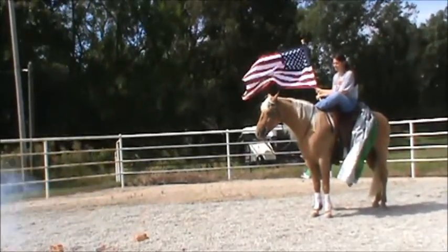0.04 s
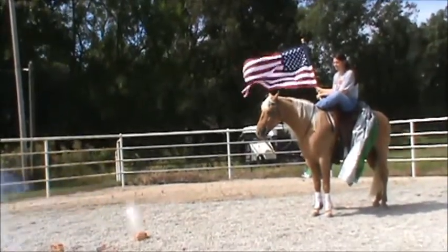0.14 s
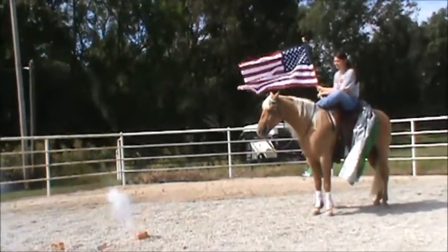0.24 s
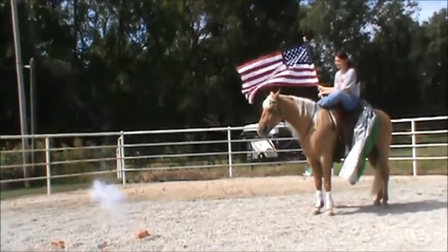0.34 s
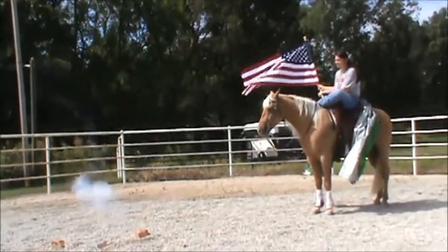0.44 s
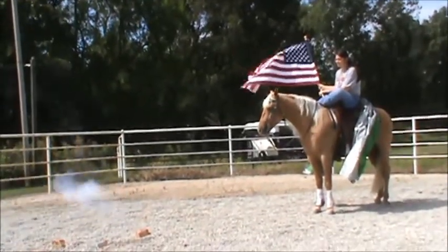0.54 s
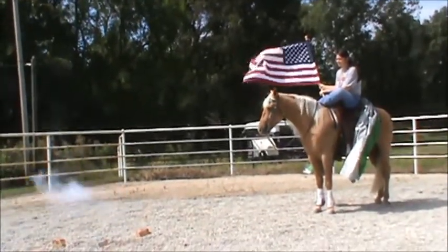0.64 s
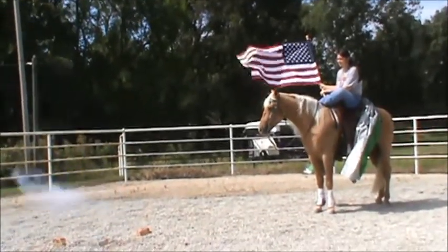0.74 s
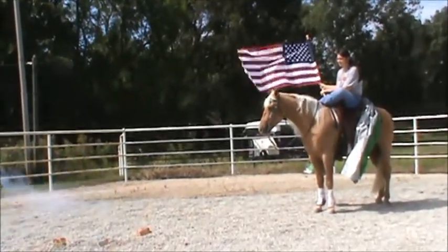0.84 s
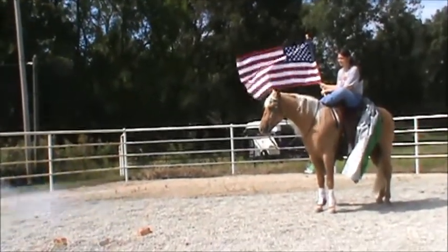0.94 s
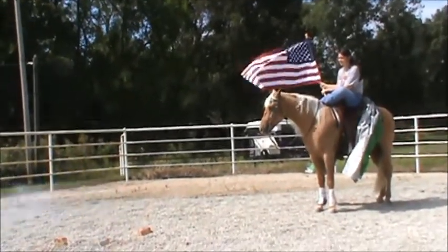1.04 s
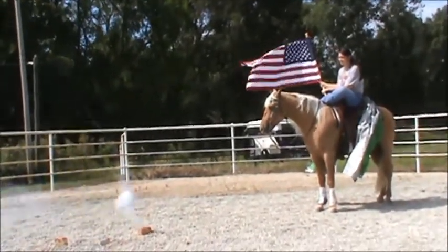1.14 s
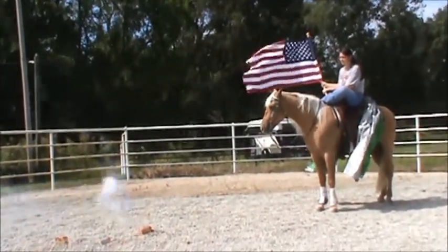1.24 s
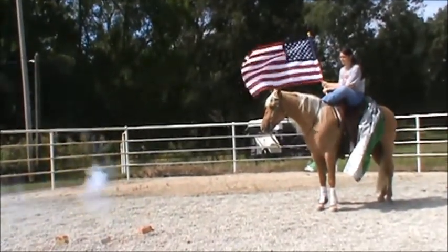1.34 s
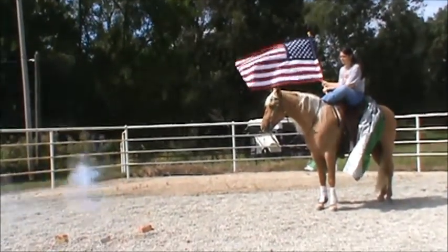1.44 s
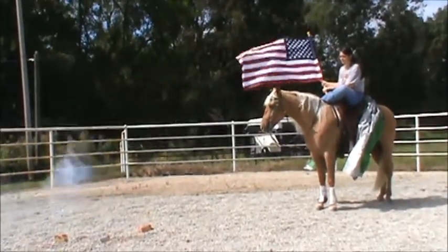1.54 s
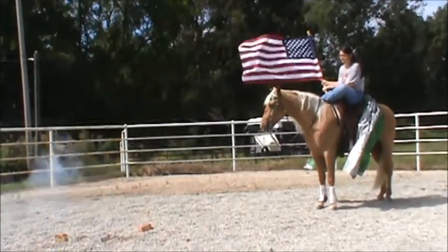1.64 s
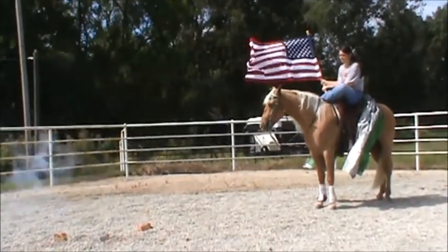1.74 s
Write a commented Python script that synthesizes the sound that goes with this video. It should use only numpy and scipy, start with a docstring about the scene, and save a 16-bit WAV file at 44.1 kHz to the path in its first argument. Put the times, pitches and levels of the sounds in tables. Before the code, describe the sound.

Two small whistling fireworks launch in turn, each screaming downward in pitch and bursting with a bang

```python
"""Faint outdoor hiss and wind buffeting come first, with the dying echo of an earlier whistle.
Two small rockets then leave a ground firework in an open, tree-lined arena, each with a thump and crack.
Each screams as gliding, fluttering partials over gas-jet noise, its pitch falling for most of its flight.
A minimum-phase shock makes each burst, and the ground returns a duller copy.
The trees scatter it all into a long wash of echo: noise that decays at its own speed in each band."""
import sys
import numpy as np
from scipy import signal
from scipy.fft import rfft, irfft
from scipy.io import wavfile

SR = 44100
rng = np.random.default_rng(int(sys.argv[2]) if len(sys.argv) > 2 else 0)


def int16_out(signal):
    """Quantize to a 16-bit WAV file."""
    q = np.round(np.clip(np.atleast_2d(signal).T, -1, 1) * 32767)
    wavfile.write(sys.argv[1], SR, q.astype(np.int16))


N = 77175
T = np.arange(N) / SR  # time in seconds
FREQS = np.fft.rfftfreq(N, 1 / SR)
ECHO_SAME, JET_SAME = 0.68, 0.95  # left-right likeness of the noise, 1 = identical
FLUTTER_HZ = 81  # rate limit of the level flutter


def amp(db):
    """Level law: decibels to amplitude gain."""
    return 10 ** (np.asarray(db) / 20)


def unit(x):
    """Normalisation: scales to an rms of one."""
    return x / np.sqrt(np.mean(x ** 2) + 1e-20)


def read(points, hz):
    """Interpolation along a logarithmic frequency axis."""
    f, value = np.transpose(points)
    return np.interp(np.log(hz + 1), np.log(f + 1), value)


def add(mix, s, sound):
    """Superposition: adds a sound to the mix from a time in seconds, cut at the end."""
    part = mix[..., round(s * SR):][..., :sound.shape[-1]]
    part += sound[..., :part.shape[-1]]


def pan(db):
    """Level difference between the ears: channel gains for a left-minus-right level."""
    return amp([[db / 2], [-db / 2]])


def colour(x, points):
    """Zero-phase filtering: multiplies the spectrum by a table of gains in dB."""
    return irfft(rfft(x) * amp(read(points, FREQS)), N)


def pair(same):
    """Partial correlation: two noise channels that share a part, which may depend on frequency."""
    shared, other = rfft(rng.standard_normal((2, N)))
    right = same * shared + np.sqrt(1 - same * same) * other
    return irfft(np.array([shared, right]), N)


def wander(hz):
    """Low-passed noise: random drift of unit rms up to a rate."""
    lowpass = 1 / (1 + (FREQS / hz) ** 4)
    return unit(irfft(rfft(rng.standard_normal(N)) * lowpass, N))


def open_air():
    """Stationary filtered noise: the faint hiss of the open air."""
    # Each row: frequency in Hz, relative level in dB.
    spectrum = [(290, -13.5), (500, -11), (678, -11.5), (1110, -2.5), (1530, -11), (1670, -6), (2360, -9.5),
                (2770, -11), (3390, -17.5), (5240, -18.5), (6060, -21), (11000, -11.5), (16000, -29)]
    return amp(-45) * unit(colour(pair(same=0.8), spectrum))


def wind():
    """Turbulent pressure on the microphone: low rumble and a higher rush, both in lumps."""
    # Each row: time in seconds, rumble level in dB, rush level in dB, both before the trims below.
    gusts = [(0, -28.5, -47), (.09, -34, -53), (.18, -36.5, -48), (.28, -31.5, -41), (.4, -37.5, -53),
             (0.489, -42, -48), (.58, -33, -37.5), (.65, -28.5, -36), (.71, -31, -45), (0.778, -41.5, -61),
             (0.888, -23.5, -27.5), (.95, -28.5, -41), (0.999, -23.5, -32.5), (1.161, -29.5, -34),
             (1.261, -28, -37.5), (1.49, -38.5, -40.5), (1.58, -26, -31.5), (1.711, -31, -40),
             (1.75, -20.5, -23.5)]
    # Each row: frequency in Hz, relative level in dB.
    rumble_spectrum = [(15, -8), (35, -21), (60, -4), (120, 0.5), (200, -3.5), (300, -16.5), (600, -75),
                       (2000, -80)]
    # Each row: frequency in Hz, relative level in dB.
    rush_spectrum = [(120, -19), (260, 2), (400, -3), (600, -14), (1200, -24.5), (4000, -101)]
    # Each row: frequency in Hz, left-right likeness of the rumble (1 = identical).
    rumble_same = [(30, 1), (70, 1), (140, 0.43), (300, 0.46)]
    rumble_trim_db, rush_trim_db = -0.5, 1.5
    lump_db, lump_hz = 3.5, 35.7  # rms depth and rate limit
    s, rumble_db, rush_db = np.transpose(gusts)
    rumble = unit(colour(pair(read(rumble_same, FREQS)), rumble_spectrum))
    rumble = rumble * amp(rumble_trim_db + np.interp(T, s, rumble_db))
    rush = unit(colour(pair(same=0.12), rush_spectrum))
    rush = rush * amp(rush_trim_db + np.interp(T, s, rush_db))
    return (rumble + rush) * unit(amp(lump_db * wander(lump_hz)))


def old_echo():
    """Exponential decay of narrow-band noise: an earlier whistle's last return from the trees."""
    centre_hz, width_hz, start_db, fall_db_per_s = 2840, 290, -43, 86
    band = np.exp(-((FREQS - centre_hz) / width_hz) ** 2)
    echo = unit(irfft(rfft(pair(ECHO_SAME)) * band, N))
    return echo * amp(start_db - fall_db_per_s * T)


def trees(x, strength, size=256):
    """Diffuse reverberation: scattered echo builds quickly and decays at its own speed in each band."""
    # Each row: frequency in Hz, time to fall by 60 dB in seconds (held within 0.2 to 3 s below).
    t60_table = [(200, 0.4), (1000, 1.22), (2800, 0.95), (5000, 0.87), (9000, 0.57), (15000, -2)]
    build_s = 0.005
    hz, t, grains = signal.stft(pair(ECHO_SAME), SR, nperseg=size)
    t60 = np.clip(read(t60_table, hz), .2, 3)[:, None]
    shape = amp(-60 * t / t60) * (1 - np.exp(-t / build_s))
    # equal energy in every band, then the strength asked for
    shape = shape / np.sqrt(N * np.mean(shape ** 2, axis=1, keepdims=True))
    shape = shape * amp(read(strength, hz))[:, None]
    tail = signal.istft(grains * shape, SR, nperseg=size)[1]
    mono = x.mean(0)[None]
    return signal.fftconvolve(mono, tail, axes=1)[:, :N]


def launches():
    """Impulsive excitation: the lifting charge thumps in its ringing tube, cracks and spits sparks."""
    # Each row: start in seconds, gain of thump and tube in dB, gain of crack and spit in dB,
    # crack decay constant in seconds.
    lifts = [(0.2041, 2, 0.5, 0.00057), (1.1619, -12, -4.5, 0.00063)]
    # Each row: frequency in Hz, relative level in dB.
    crack_spectrum = [(300, -27), (900, 1), (1400, -22.5), (3000, 0), (5000, -14), (7000, -6),
                      (10500, -1.5), (13000, -6), (16000, -11.5)]
    thump_hz, thump_decay_s = 331, 0.0013
    tube_hz, tube_db, tube_decay_s = 770, -9.5, 0.0021
    spit_db, spit_decay_s = -26.5, 0.017  # level relative to the crack
    thump_envelope = T / thump_decay_s * np.exp(-T / thump_decay_s)
    thump = np.sin(2 * np.pi * thump_hz * T) * thump_envelope
    tube = np.sin(2 * np.pi * tube_hz * T) * amp(tube_db) * np.exp(-T / tube_decay_s)
    spit_envelope = amp(spit_db) * np.exp(-T / spit_decay_s)
    out = np.zeros((2, N))
    for s, thump_db, crack_db, decay_s in lifts:
        noise = unit(colour(pair(JET_SAME), crack_spectrum))
        crack = noise * (np.exp(-T / decay_s) + spit_envelope)
        add(out, s, amp(thump_db) * (tube + thump) + amp(crack_db) * crack)
    return out


def bursts(size=4096):
    """Minimum-phase shock with a ragged wake, then its low-passed reflection off the ground."""
    # Each row: start in seconds, gain in dB, ground echo delay in seconds,
    # ground echo level relative to the shock in dB.
    events = [(0.536, 19, .0058, -5), (1.383, 17.5, .0055, -6.5)]
    # Each row: frequency in Hz, level in dB before the burst's gain.
    blast_spectrum = [(60, -19), (300, -7), (750, 1.5), (1600, 4), (3000, -5.5), (5000, -8), (9000, -9.5),
                      (12000, -17), (16000, -37)]
    wake_db, wake_decay_s = -3, .006
    ground_hz = 3900  # the soil dulls the echo above this
    log_gain = np.log(amp(read(blast_spectrum, abs(np.fft.fftfreq(size, 1 / SR)))))
    # the Hilbert transform of the log gain gives the minimum phase
    shock = -np.fft.ifft(np.exp(np.conj(signal.hilbert(log_gain)))).real
    dulled = signal.lfilter(*signal.butter(2, ground_hz, fs=SR), shock)
    out = np.zeros((2, N))
    for s, db, delay_s, echo_db in events:
        scatter = (pair(ECHO_SAME) * np.exp(-T / wake_decay_s))[:, :size]
        scatter = scatter / np.linalg.norm(scatter[0])
        wake = signal.fftconvolve(scatter, shock[None], axes=1)
        add(out, s, amp(db) * shock)
        add(out, s, amp(db + wake_db) * wake)
        add(out, s + delay_s, amp(db + echo_db) * dulled)
    return out * pan(db=1)


def flutter():
    """Amplitude modulation in dB: dips outweigh swells, and the channels differ slightly."""
    depth_db, ear_db = 3.5, 2.52
    dips = np.minimum(wander(FLUTTER_HZ), 0.28)  # the swells are capped
    ears = np.array([wander(FLUTTER_HZ), wander(FLUTTER_HZ)])
    return depth_db * dips + ear_db * ears


def whistle(rows):
    """Harmonic series on a gliding, jittered fundamental, with turbulent noise from the gas jet."""
    # Each row: partial number, level offset in dB, left-minus-right level in dB.
    upper_partials = [(3, -2.5, 2.5), (4, -5.5, 1), (5, -18, -3), (6, -29, 0)]
    # Each row: frequency in Hz, relative level of the jet's fizz in dB.
    fizz_spectrum = [(300, -47), (1200, -26), (2200, -7.5), (3000, 8.5), (3800, -6.5), (5500, -2.5),
                     (9000, 10), (12000, 2.5), (16000, -13.5)]
    # Each row: frequency in Hz, relative level of the jet's darker roar in dB.
    roar_spectrum = [(300, -9.5), (900, -8), (2000, 1.5), (3500, -1), (6000, -1), (10000, -8), (16000, -30)]
    lead_s, attack_s, release_s = 0.00205, 0.00047, .008
    chirp, chirp_s = .1, 0.00197  # the pitch starts sharp by this share and settles at once
    jitter, jitter_hz, wobble, wobble_hz = .0065, 1400, 0.00419, 71.1  # rms shares of pitch, rate limits
    dull_db_per_s = 4.5  # each partial above the third fades faster with distance
    fizz_trim_db, fizz_follow, fizz_flutter_db = -13.5, 0.85, 2.5  # follow: dB per dB of upper partials
    ignite_db, ignite_s = 7.5, 0.0024  # the jet flares as it lights
    roar_start_db, roar_db_per_s = -48.5, 30.5  # it grows as the fuel burns down
    overall_db = 4.5

    s, hz, first_db, second_db, upper_db = np.transpose(rows)
    age = np.maximum(T - s[0] + lead_s, 0)
    attack = np.minimum(age / attack_s, 1)
    gate = attack * np.exp(-np.maximum(T - s[-1], 0) / release_s)

    bend = chirp * np.exp(-age / chirp_s) + jitter * wander(jitter_hz) + wobble * wander(wobble_hz)
    phase = 2 * np.pi * np.cumsum(np.interp(T, s, hz) * (1 + bend)) / SR
    first, second, upper = (np.interp(T, s, db) for db in (first_db, second_db, upper_db))
    partials = [(1, first, 5), (2, second, 1.5)]  # number, level in dB, left-minus-right dB
    for i, (k, db, side) in enumerate(upper_partials):
        partials.append((round(k), upper + db - dull_db_per_s * age * i, side))
    tone = np.zeros((2, N))
    for k, db, side in partials:
        tone += pan(side) * amp(db + flutter()) * np.sin(k * phase)

    flare_db = ignite_db * np.exp(-age / ignite_s)
    fizz_db = fizz_trim_db + fizz_follow * upper + flare_db + fizz_flutter_db * wander(FLUTTER_HZ)
    fizz = unit(colour(pair(JET_SAME), fizz_spectrum)) * amp(fizz_db)
    roar = unit(colour(pair(JET_SAME), roar_spectrum)) * amp(roar_start_db + roar_db_per_s * age)
    return amp(overall_db) * gate * np.array([tone, fizz + roar])


def scene():
    """Superposition of open air, wind, echoes and the two rockets."""
    # One table per rocket. Each row: time in seconds, pitch in Hz before bends, then levels in dB before
    # the whistle's overall gain and flutter: fundamental, second partial, reference for upper partials.
    rockets = [
        [(.219, 3068, -6.5, -22, -8.5), (.235, 3077, -10.5, -12.5, -8.5), (.27, 3043, -5, -15.5, -7.5),
         (.305, 3001, -8.5, -20, -9.5), (.334, 2857, -10, -16.5, -11.5), (.367, 2833, -8, -14.5, -15),
         (.388, 2713, -9, -18.5, -15.5), (.438, 2665, -8, -13.5, -14), (.465, 2572, -8, -18, -15),
         (.495, 2526, -11.5, -18.5, -18), (.515, 2520, -18.5, -22, -28.5), (.545, 2440, -29, -29, -45),
         (.58, 2450, -17.5, -26, -37.5), (.611, 2400, -22.5, -29, -37.5), (.627, 2554, -23.5, -61, -29),
         (.64, 2695, -32.5, -40, -44)],
        [(1.175, 3120, -17, -37, -26.5), (1.19, 3125, -15, -35, -19), (1.216, 3143, -15.5, -22.5, -19),
         (1.25, 2996, -9, -20.5, -20), (1.29, 2849, -16.5, -26, -21), (1.335, 2735, -12.5, -20, -22.5),
         (1.365, 2650, -18.5, -23.5, -20), (1.387, 2595, -24, -33.5, -41), (1.42, 2482, -14.5, -25.5, -27.5),
         (1.455, 2440, -21, -30, -28.5), (1.487, 2423, -15, -27.5, -24), (1.502, 2413, -20.5, -34, -40),
         (1.524, 2590, -32, -34.5, -34), (1.536, 2703, -29, -46, -59)],
    ]
    # Each row: frequency in Hz, strength of the echo of the tones in dB.
    tone_echo = [(2000, -34), (2500, -28), (2950, -10.5), (3500, -28), (5000, -28), (9000, -22.5),
                 (15000, -12)]
    # Each row: frequency in Hz, strength of the echo of jets and launches in dB.
    jet_echo = [(300, -18), (1500, -13), (4000, 0), (8000, -9.5), (15000, 1.5)]
    # Each row: frequency in Hz, strength of the echo of bursts in dB.
    blast_echo = [(200, -12), (1000, -5), (2500, -1.5), (5000, -9.5), (14000, 7)]
    tones, jets = sum(whistle(rows) for rows in rockets)
    jets = jets + launches()
    blasts = bursts()
    echo = trees(tones, tone_echo) + trees(jets, jet_echo) + trees(blasts, blast_echo)
    # a near reflection beats against the gliding tone
    add(echo, .011, amp(-13.5) * tones)
    return open_air() + wind() + old_echo() + echo + blasts + jets + tones


def record(dry, size=300):
    """Dynamic compression with instant peak hold and linear dB recovery, clipping, then a band limit."""
    duck_from_db, duck_share, recover_db_per_s = -16, 0.5, 53  # share: dB of cut per dB of excess
    ceiling, edge_hz = 0.97, 15850
    power = signal.lfilter([1 / size], [1, 1 / size - 1], (dry ** 2).mean(0))  # smoothed over ~size samples
    power_db = 10 * np.log10(power + 1e-12)
    fall_db = T * recover_db_per_s
    held_db = np.maximum.accumulate(power_db + fall_db) - fall_db
    over_db = np.maximum(held_db - duck_from_db, 0)
    ducked = np.clip(dry * amp(-duck_share * over_db), -ceiling, ceiling)
    lowpass = signal.firwin(401, edge_hz, window=("kaiser", 9), fs=SR)
    return signal.oaconvolve(ducked, lowpass[None], "same")


dry = scene()
out = record(dry)
int16_out(out)
```